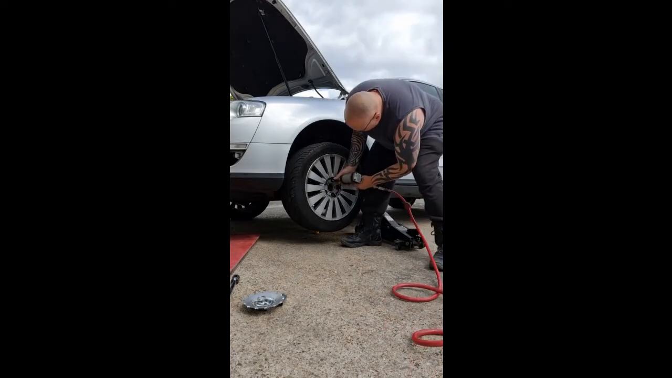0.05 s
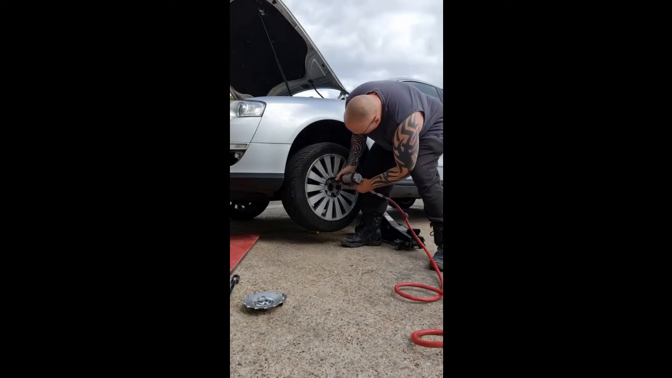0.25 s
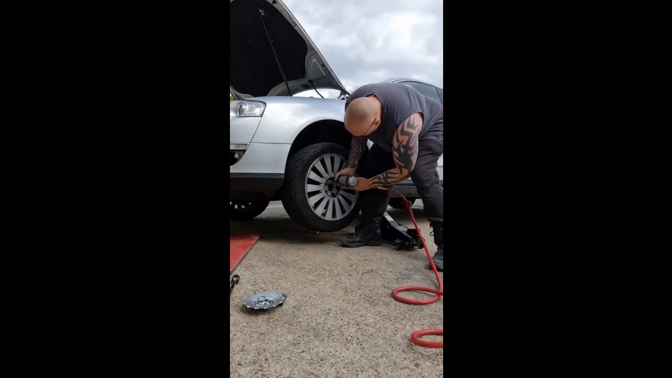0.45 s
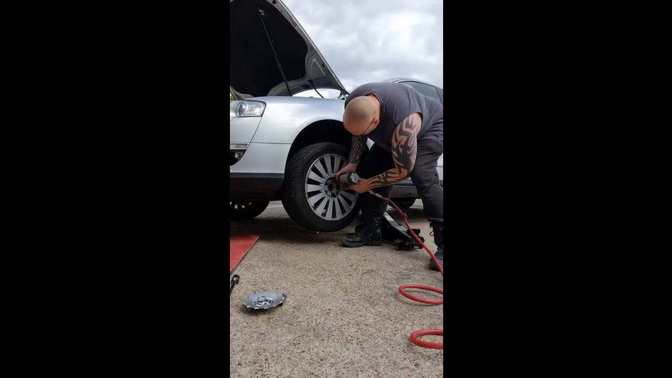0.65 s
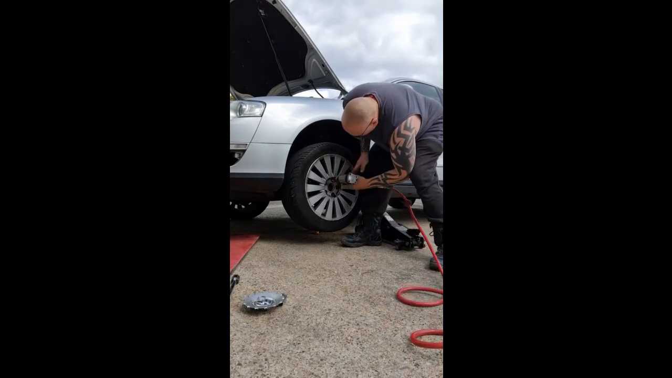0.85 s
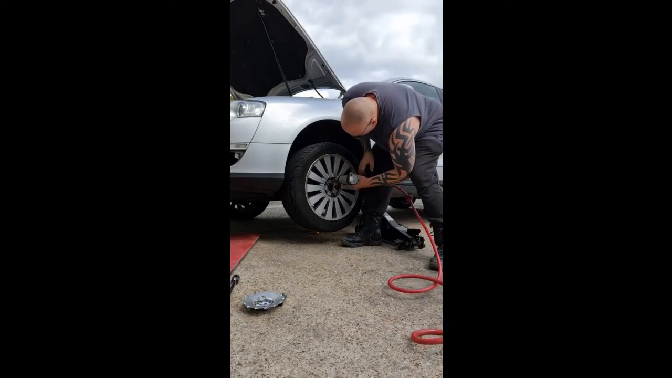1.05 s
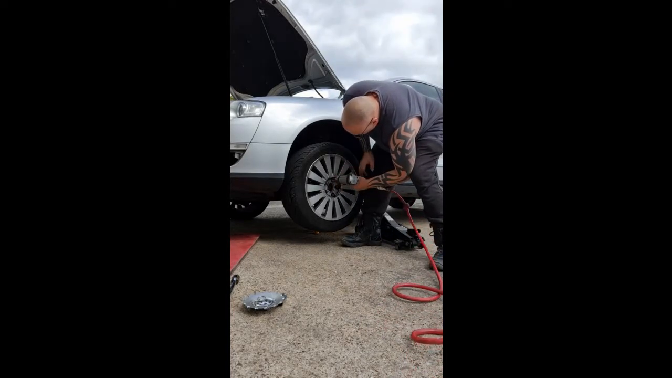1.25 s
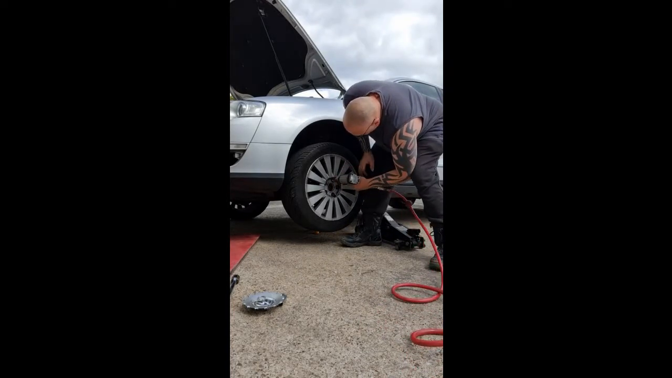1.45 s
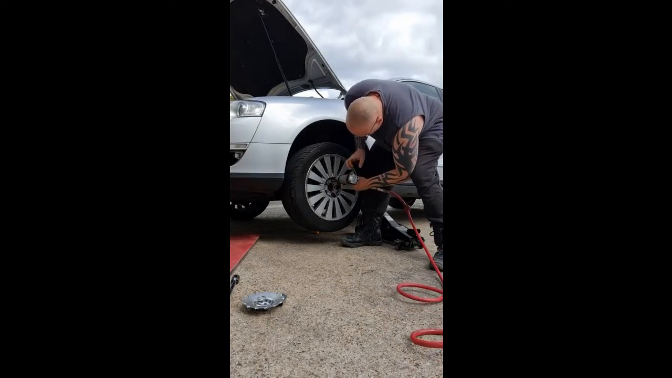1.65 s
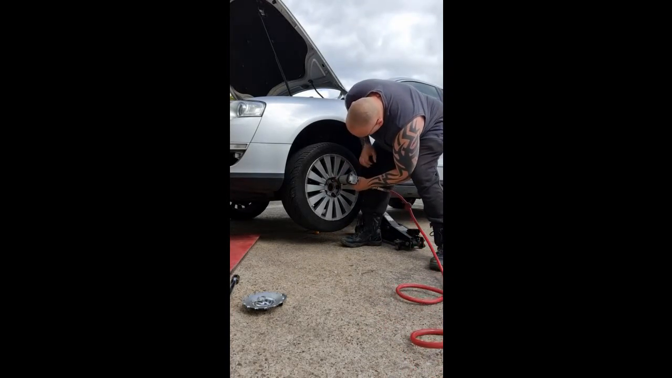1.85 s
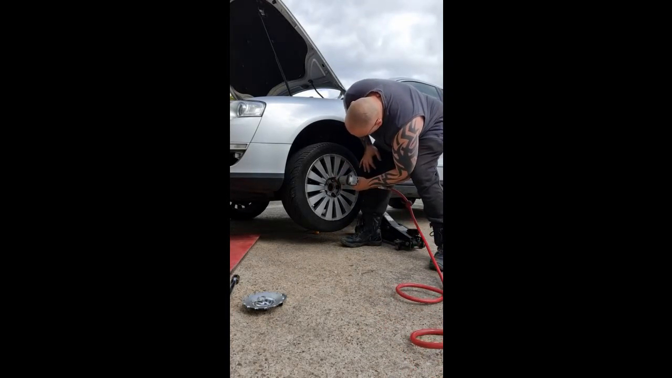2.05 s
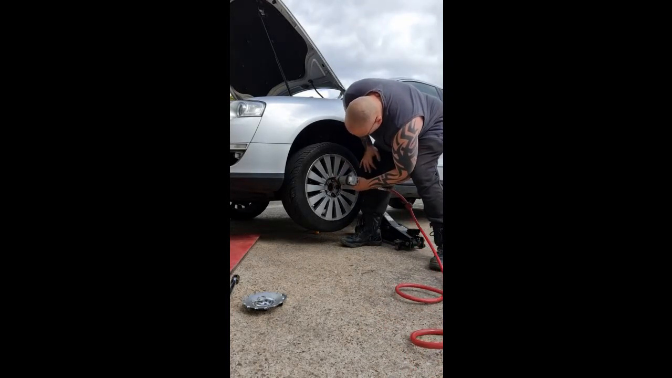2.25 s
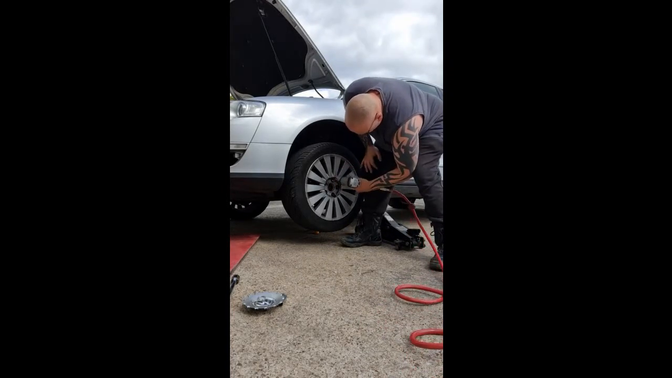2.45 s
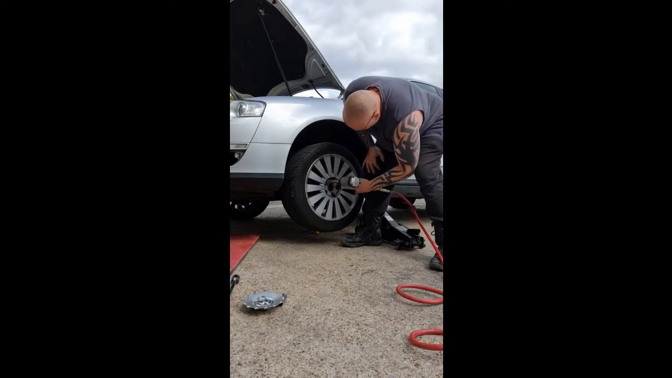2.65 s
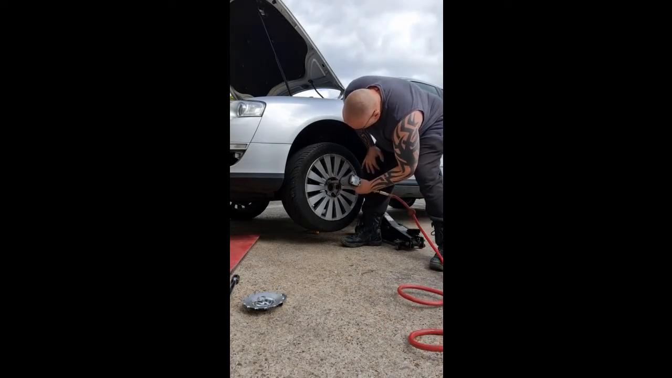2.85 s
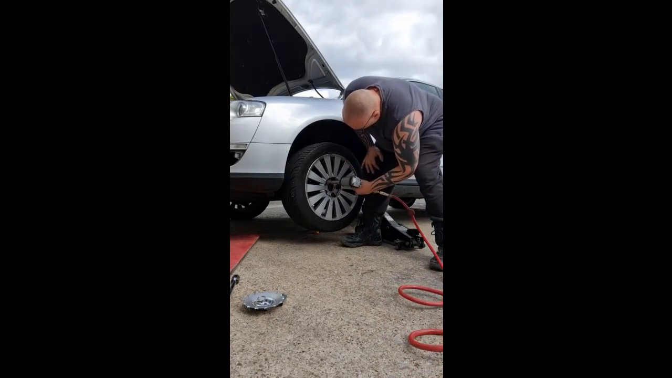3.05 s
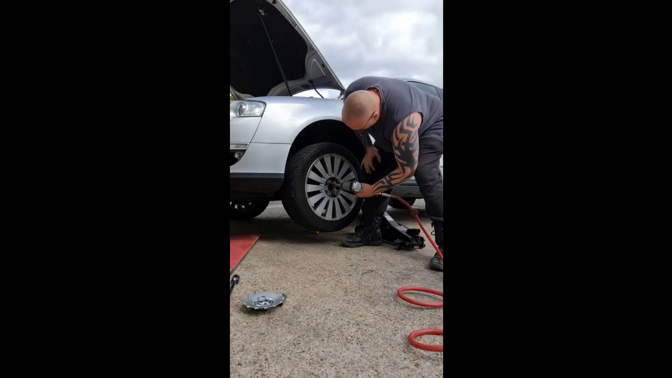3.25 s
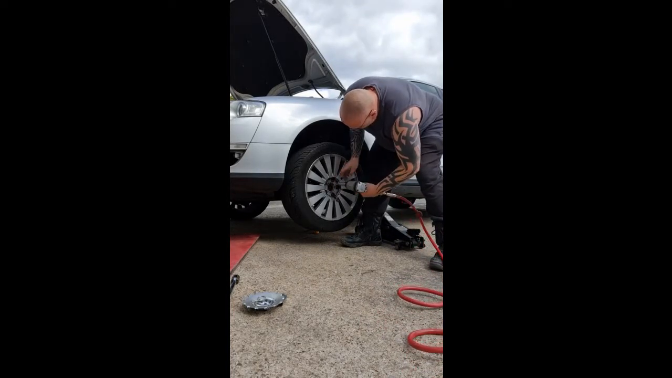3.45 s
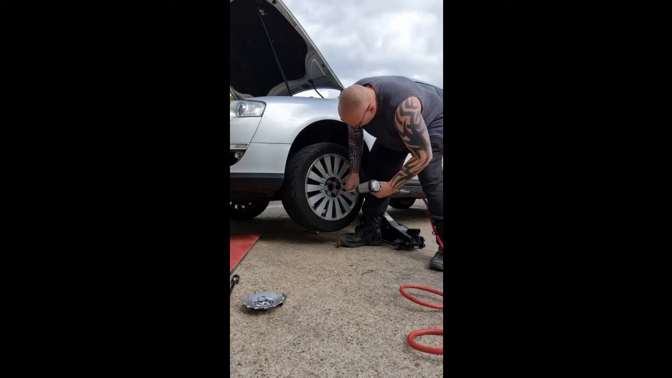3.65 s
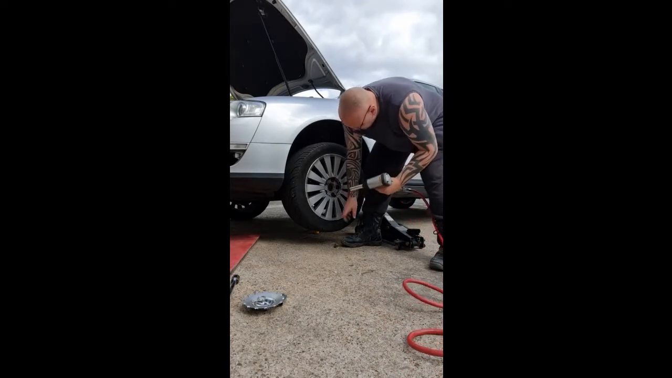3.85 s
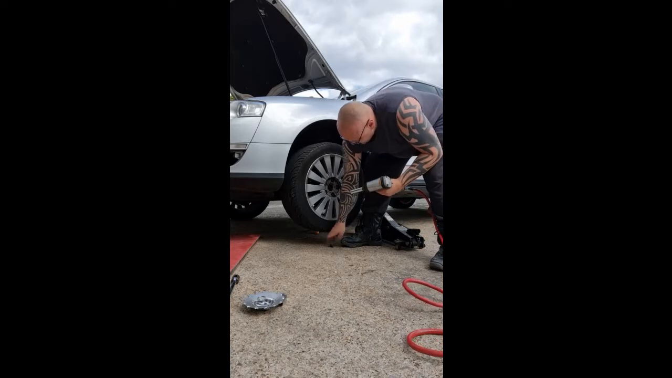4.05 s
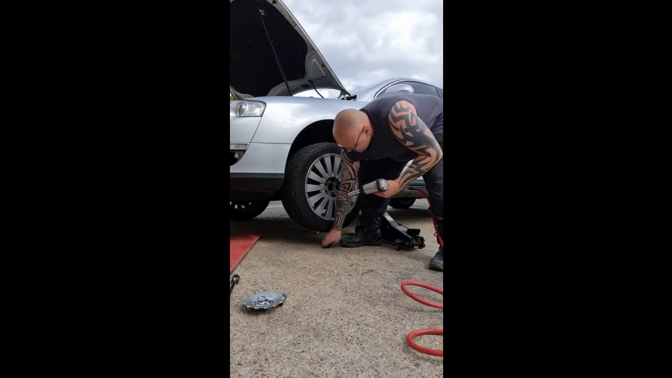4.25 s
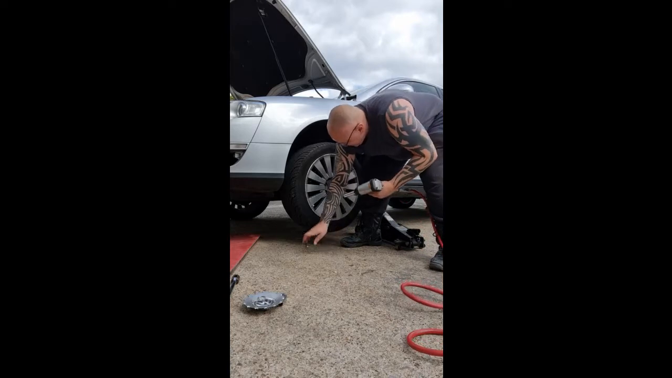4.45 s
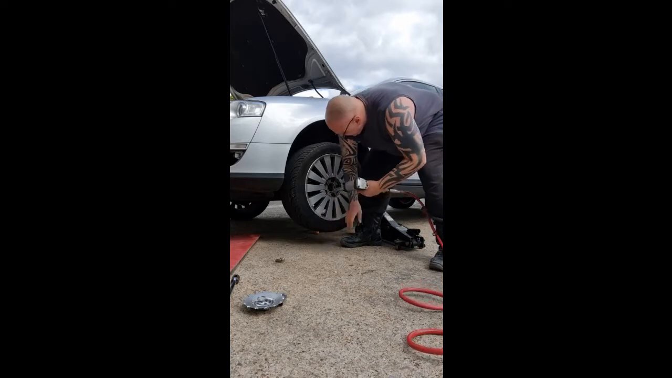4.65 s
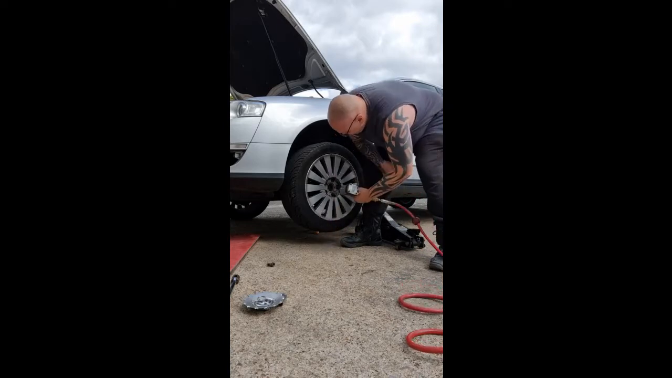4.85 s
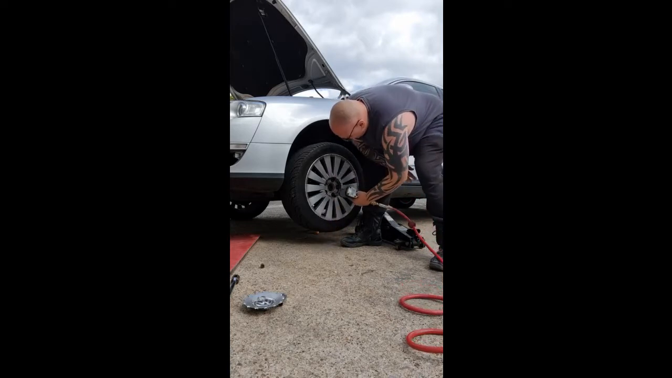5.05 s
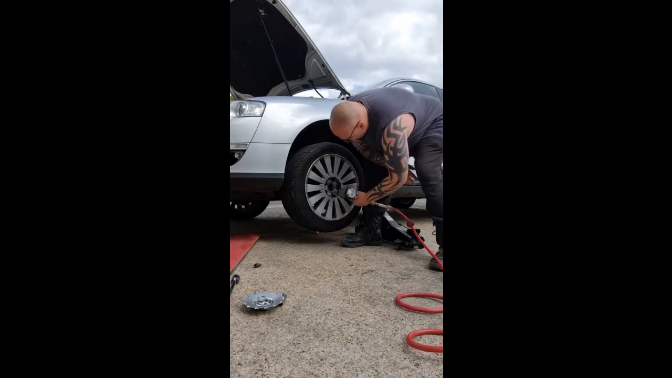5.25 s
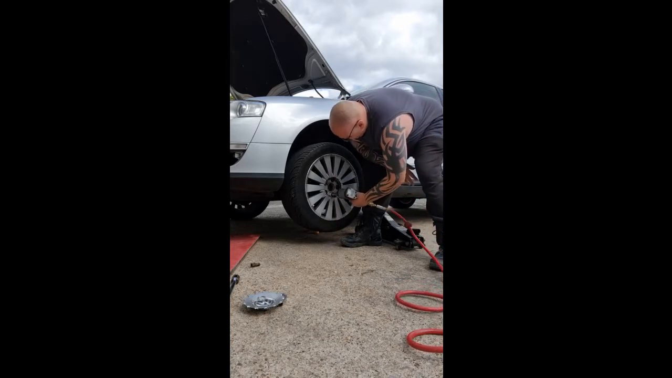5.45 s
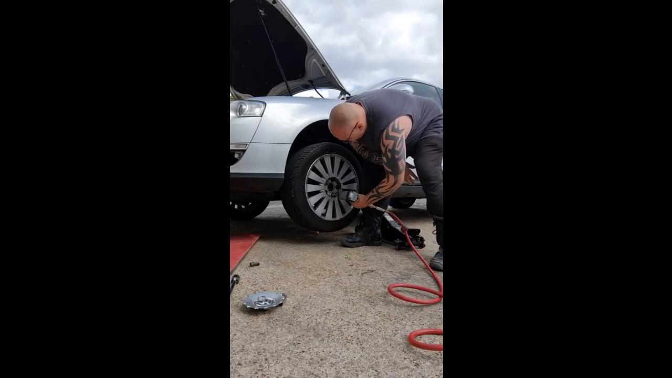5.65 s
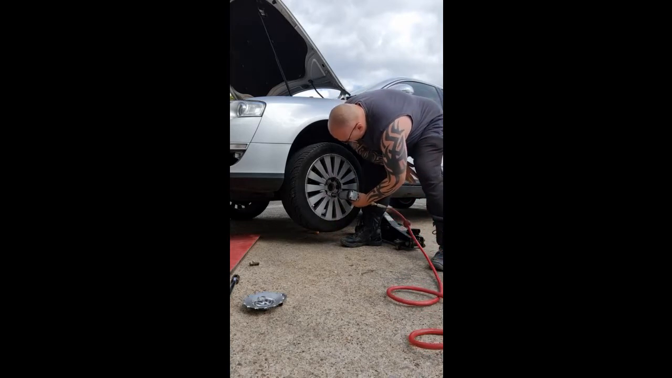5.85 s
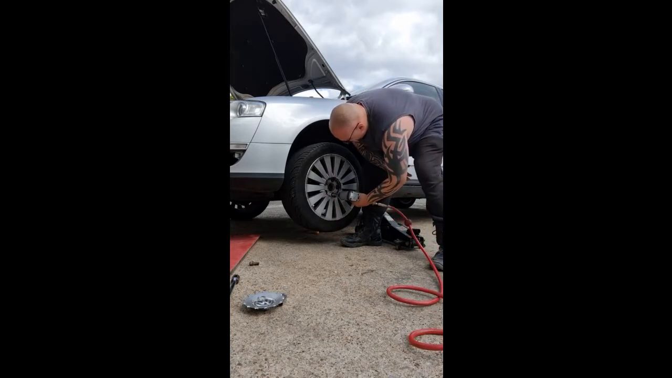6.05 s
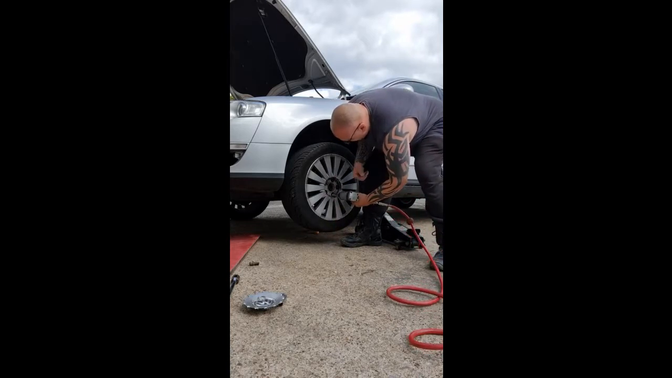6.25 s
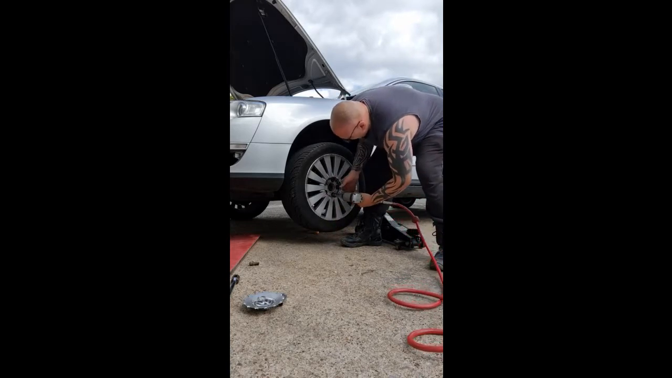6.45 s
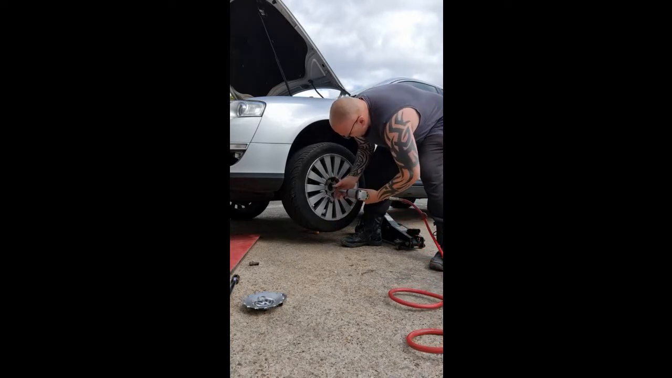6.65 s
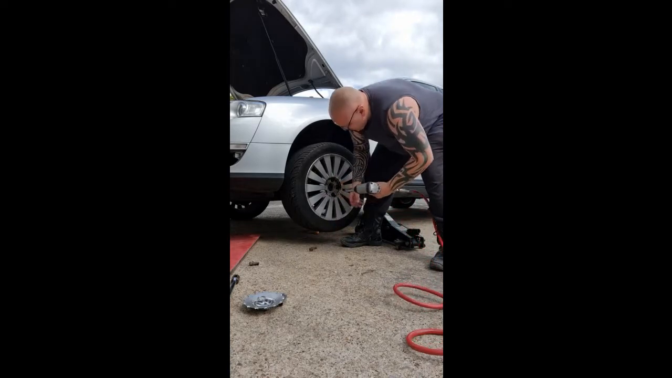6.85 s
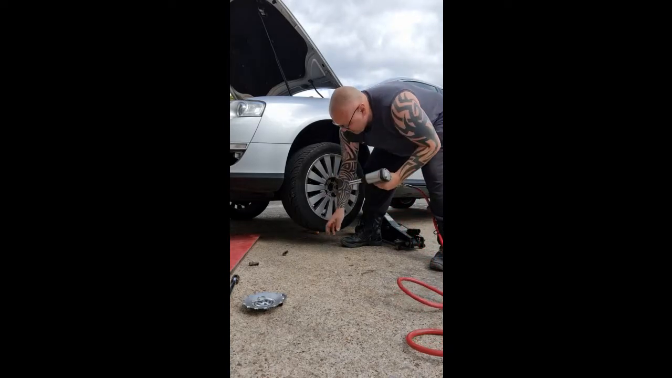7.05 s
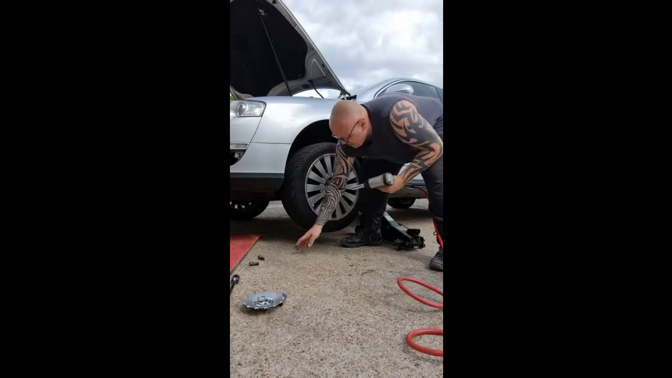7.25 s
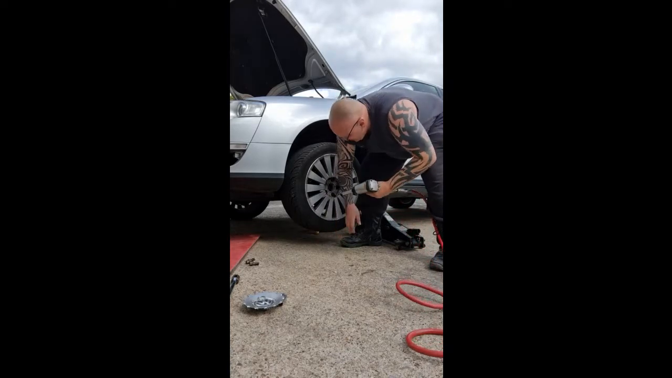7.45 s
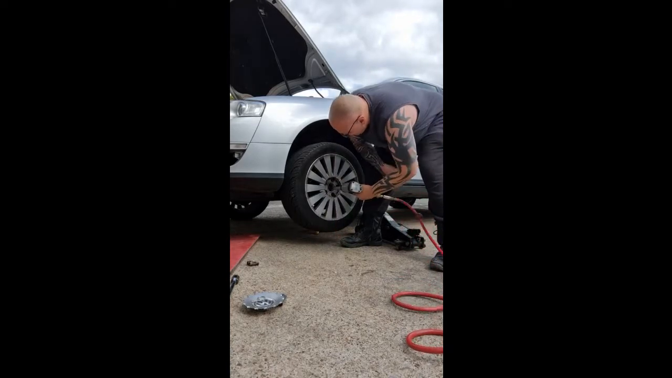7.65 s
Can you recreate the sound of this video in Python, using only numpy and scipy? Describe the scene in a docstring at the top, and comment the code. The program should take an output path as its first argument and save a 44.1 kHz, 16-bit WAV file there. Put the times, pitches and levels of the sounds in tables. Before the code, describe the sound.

Close stereo sound of wheel work in an open yard: steel knocks on a rim, a brief rattling impact burst, then a second with a falling motor whine. A loose bolt clacks in the socket and lands lightly on concrete. The socket scrapes onto the next bolt, five hard blows crack out, and the wrench whirs freely and coasts down. Air hiss and a faint distant drone lie underneath.

```python
"""Air wrench on a car wheel

An air impact wrench spins two bolts out of a jacked-up car wheel on a driveway. Each trigger pull lets out shaped
noise as air and spins up a vane motor, whose puffs ring resonances; the motor then whines and coasts down.
Hammer blows, clinks on the alloy rim and bolts on concrete are noise bursts with fading tones.
Air hiss comes and goes in spells, and a low rumble and a far machine's drone lie behind it all."""
import sys
import numpy as np
from scipy import signal
from scipy.fft import rfft, irfft, next_fast_len
from scipy.io import wavfile
from scipy.ndimage import map_coordinates

SR = 44100
rng = np.random.default_rng(int(sys.argv[2]) if len(sys.argv) > 2 else 0)


def digitize_waveform(pressure):
    """Quantize a signal to 16-bit integers and store it at the path in sys.argv[1].

    Rows of a 2-D input are taken as channels; values are limited to [-1, 1].
    """
    field = np.atleast_2d(pressure).T
    bounded = np.clip(field, -1, 1)
    quanta = np.round(bounded * 32767).astype(np.int16)
    wavfile.write(sys.argv[1], SR, quanta)


N = 339555
TIME = np.arange(N) / SR
AFTER = np.arange(SR // 2) / SR  # seconds since a contact

# Rumble level over time. Each row: time in seconds, level in dB.
RUMBLE_SWELL = [(0, -45), (1.2, -42), (3.35, -44), (3.7, -49), (5.2, -51.5), (6.9, -43), (7.7, -50)]
# Noise spectra of the background. Each row: frequency in Hz, relative level in dB per Hz.
RUMBLE = [(15, -42.5), (32, -8.5), (55, 5), (120, -9.5), (200, -24), (400, -78)]
OUTDOORS = [(80, -9.5), (190, -6), (300, -10), (560, -12.5), (830, -12.5), (1250, -15.5), (1700, -18),
            (3000, -29), (16000, -50.5)]
# A distant machine. Each row: pitch in Hz, width in Hz, level in dB.
DRONE = [(412, 9, -66), (835, 22, -63.5), (1245, 70, -65)]
RECEDE_S, RECEDE_DB_PER_S = 3.2, -0.5  # the distant sounds fall away from this time on

# Air hiss comes and goes in spells. Each row: start in seconds, end in seconds,
# fine hiss in dB, lower rush in dB.
HISS_SPELLS = [(-.1, .404, -54.5, -53.5), (.463, 3.446, -59.5, -65), (.821, 1.297, -60, -59),
               (3.554, 4.583, -55.5, -77.5), (5.127, 5.72, -62.5, -70), (6.402, 7.449, -55.5, -59)]
# Noise spectra of the air hiss. Each row: frequency in Hz, relative level in dB per Hz.
HISS = [(3000, -28.5), (6200, -7), (8000, -8), (10000, -8.5), (12000, 0.5), (16000, -6)]
RUSH = [(1200, 2), (2500, -0.5), (3600, 6), (4900, -9), (6100, 5), (7800, -28.5), (12000, -7)]

# How much the ears differ. Each row: frequency in Hz, side over mid in dB.
WIDTH = [(150, -16), (400, -11.5), (1000, -4), (2000, -2.5), (5000, 1), (12000, 0.5)]
# Sideways lean of the work at the wheel. Each row: frequency in Hz, left over right in dB.
LEAN = [(200, 0.5), (650, -2.5), (1290, 2.5), (2400, 0.5), (8000, 0.8)]
# Echo tail of the yard. Each row: frequency in Hz, time to fall 60 dB in seconds.
YARD_TAIL = [(150, 1), (1000, 0.34), (5000, 0.15), (14000, 0.074)]
TOP_HZ = 16100  # nothing sounds above this

# A loose bolt clacks in the socket. Each row: time in seconds, level in dB,
# brightness in dB per octave, high ring in dB relative to the level.
RATTLES = [(2.2553, -32, 6, 5), (2.383, -31, 9.5, 0), (2.4145, -33.5, 10.5, -2.5), (2.6635, -27.5, 5, -6),
           (3.6596, -34.5, -1, -9), (6.3614, -33.5, 4, 13), (6.8598, -25.5, 4, -26)]
# Lighter rattles while a freed bolt spins down.
CHATTER_S, CHATTER_DB, CHATTER_RING_DB = 0.14, -33.5, 7.5
# Bolts touch the concrete. Each row: time in seconds, level in dB.
TICKS = [(4.5455, -42.5), (4.6295, -41), (4.6895, -47), (4.7643, -49.5), (7.0649, -39.5), (7.663, -53.5)]
# Socket and bolts meet the rim. Each row: time in seconds, level in dB, brightness in dB per octave,
# tyre thud in dB, rim ring in dB relative to the level.
CLINKS = [(0.048, -24, 2, -36.5, -11), (0.3632, -30, -1, -52, -9.5), (0.5129, -25, 0.5, -28.5, -14),
          (2.707, -31.5, 1.5, -36, -9.5), (2.7444, -22, 3.5, -44, -18.5), (3.251, -23.5, -1, -65, -5.5),
          (3.336, -34.5, -3.5, -62, -4.5), (3.3599, -36.5, -5, -65, -8.5), (3.4, -42.5, -4, -63, 0.5),
          (3.437, -43, -2.5, -65, -10), (5.026, -28, -7.5, -60, -10), (5.0402, -28.5, 0, -39.5, -13),
          (5.2833, -34, -2, -53.5, -11.5), (5.3083, -28, -5, -45, -17), (5.3236, -27.5, -1, -34.5, -15),
          (5.3786, -29.5, 4.5, -54, -9.5), (5.507, -19, -0.5, -23.5, -15.5), (6.419, -43.5, -4, -60, -12),
          (6.479, -48, -1, -60, -17)]
# Each knock settles in a few uneven, ever weaker bounces: typical gap, first level, change per further bounce.
SETTLE_S, SETTLE_DB, SETTLE_LOSS_DB = 0.009, -10.5, -8.5
# Dull bumps as the wheel is leaned on. Each row: time in seconds, level in dB, pitch in Hz.
BUMPS = [(0.78, -26, 108.5), (0.81, -34.5, 130), (3.154, -31, 67.5), (3.282, -32.5, 58.4)]

# Hammer blows while a bolt resists. Each row: time in seconds, level in dB, brightness in dB per octave,
# then relative to the level: wheel thud in dB, socket ring in Hz, ring in dB.
BLOWS = [(1.2662, -18, 0, -15, 5600, 1), (1.2952, -10.5, 0, -21.5, 6180, -4),
         (1.3255, -14, 14, -16.5, 3420, -9.5), (1.3522, -11, 6.5, -14.5, 4370, -13),
         (1.3781, -12.5, 5, -17.5, 5530, -1), (1.9703, -24, 6.5, -10.5, 5000, -7.5),
         (2.002, -11, 5, -12.5, 2490, -3), (2.0385, -11.5, 6.5, -21.5, 5400, -5.5),
         (5.734, -16.5, 0.5, -30, 2846, -5.5), (5.7671, -12, -3, -6.5, 3510, -4),
         (5.8, -9, -5, -11.5, 2870, -3.5), (5.8296, -12, -3.5, -18.5, 2910, -1),
         (5.864, -10.5, -1.5, -11.5, 4100, 1.5)]
# The socket jolts as the drive is taken up or let go. Each row: as for the blows.
JOLTS = [(1.248, -22, -6.5, -17.5, 5960, -7.5), (1.9515, -26.5, -1.5, -9.5, 1900, -9),
         (5.7175, -20, -5.5, -15.5, 5870, -10), (5.9185, -12, 1, -15, 5980, -6),
         (5.942, -24, 2.5, -12, 6020, -15)]
RECOIL_S, RECOIL_DB = .011, -9.5  # the hammer falls back on the anvil: typical delay, relative level

# Ringing parts. Each row: pitch in Hz, relative level in dB, time to fall 60 dB in seconds.
RIM = [(564, -7.5, 0.08), (1352, 3, 0.068), (1742, -1.5, 0.12), (3125, -4.5, 0.09), (3620, 3, 0.021),
       (4450, -6.5, 0.035)]
ANVIL = [(1260, -2.5, 0.05), (1735, -0.5, 0.089), (2047, -3, 0.09), (2433, -5, 0.085), (2866, -4.5, 0.05),
         (3380, -4, 0.07), (4120, -0.5, 0.027), (5200, -6.5, .08), (5950, -1.5, 0.075)]
WHEEL = [(206, -2.5, 0.085), (262.3, -7.5, .08), (400, -11.5, 0.17), (534, -18.5, 0.82), (603, 1, 0.08),
         (695, -3, 0.091)]
TYRE = [(222.3, -3, 0.15), (184.6, -3.5, 0.19), (274, -6, .09), (398, 0, 0.038)]
BOLT = [(2555, 2, 0.04), (3340, 7, 0.069), (4196, 14, 0.045), (5010, 18, 0.043)]
# Noise spectra of the contacts. Each row: frequency in Hz, relative level in dB per Hz.
CRACK = [(120, -42), (200, -22), (3560, -6), (6050, -2.5), (7270, -16.5), (8580, -0.5), (14900, -12.5),
         (16000, -27.5)]
CLACK = [(180, -35), (300, -19), (915, -9.5), (1280, -3.5), (2650, -7.5), (3640, -6), (4160, -16),
         (5610, -12.5), (7320, -26), (8500, -22.5), (16000, -39.5)]
GRIT = [(500, -22.5), (2000, -2), (4500, -2), (8000, -12), (16000, -29.5)]
HIGH_RING = [(13500, -60.5), (14650, -8), (15800, -58.5)]

# Faint whistle of escaping air, sinking as the rotor stops. Each row: time in seconds, pitch in Hz, level in dB.
AIR_WHISTLE = [(6.5, 2880, -61), (6.66, 2620, -54), (6.735, 2470, -48.5), (6.78, 2450, -63), (7, 2450, -64)]

# Trigger pulls. Each row: open in seconds, shut in seconds, vane rate that the load allows in Hz,
# friction (1 = free bolt), air in dB, air brightness in dB per octave, whine in dB, bearing rasp in dB,
# socket judder in dB.
PULLS = [(1.243, 1.374, 329.7, 3.75, -20, 1, -38, -36.5, -23),
         (1.943, 2.136, 445.8, 1.026, -24, 1.5, -18, -36, -21),
         (5.708, 5.898, 311.2, 1.9, -22.5, 1.2, -19, -36, -26),
         (6.022, 6.183, 459.8, 1.01, -22.5, 1.5, -20.5, -36, -35)]
SPIN_UP_S, DRAIN_S = .06, .015  # the rotor's lag behind the air; the drive outlasts the trigger
DRAG, STOP_S = .0106, .91  # coasting: drag per vane pass, dry-friction time; friction shortens both
FULL_HZ = 400  # vane rate at which growth with speed adds nothing
WHINE_DB_PER_OCTAVE, RASP_DB_PER_OCTAVE = 18.5, 6  # growth with speed
LOAD_DB = -7  # the tone gives way under load
# A narrow resonance that whistles after the last pull opens. Each row: vane rate in Hz,
# resonance in Hz, level in dB.
WHISTLE = [(90, 1220, -50), (115, 1230, -33), (160, 1265, -26.5), (230, 1295, -20), (430, 1325, -14)]
WHISTLE_WIDTH_HZ = 42
SECOND_BOLT_S = 4  # the second bolt's resonances hold from here
# The motor's lowest tone. Each row: vane rate in Hz, level in dB.
HUM = [(50, -51.5), (100, -33), (150, -33.5), (195, -28), (280, -39), (430, -29)]
# Resonances under the whine. Each row: frequency in Hz, width in Hz, dB at the first bolt, dB at the second.
BODY = [(543, 100, -9, -3), (805, 26, -4, 4.5), (1140, 300, -9, 0.5), (1775, 130, 0.5, 0),
        (2010, 81, -2.5, -19), (2510, 38.6, -2.5, -4.5), (2760, 34, -16.5, -11), (3250, 100, -14, -20),
        (3890, 130, -20, -9.5), (5870, 180, -9.5, -41)]
# Resonances of the spinning socket as it jiggles on the bolt head. Each row: frequency in Hz,
# width in Hz, dB at the first bolt, dB at the second.
SOCKET = [(1890, 190, 0, -6.5), (2415, 87, -2, -4.5), (2850, 17, -11.5, -2.5), (3270, 90, -4.5, -4),
          (3810, 53, -15.5, -2.5), (5070, 58, -13, -9), (5940, 250, 0, -5.5)]
JIGGLES_PER_S, JUDDERS_PER_S, JIGGLE_SPREAD_DB = 1000, 330, 3
JIGGLE_DB, JIGGLE_DB_PER_OCTAVE = -20.5, 7  # level at FULL_HZ and growth with speed
# Noise spectra of the motor and its air. Each row: frequency in Hz, relative level in dB per Hz.
RASP = [(150, 8), (500, -0.5), (1000, 4.5), (1900, 4.5), (4800, -7), (6000, -6.5), (7800, -9.5),
        (12500, -5.5), (16000, -19)]
EXHAUST = [(59, -19.5), (100, -1.5), (784, -0.5), (1030, -11.5), (1250, -5), (1420, -5), (2040, 0),
           (2270, -9.5), (2470, -2.5), (4200, -6.5), (5770, -9), (7770, -12), (10700, -12), (14700, -18.5),
           (16000, -33.5)]


def amp(db):
    """Turn decibels into gain."""
    return 10 ** (np.asarray(db) / 20)


def unit(x):
    """Scale to an average (rms) level of 1."""
    return x / np.sqrt(np.mean(x ** 2) + 1e-20)


def along(points, hz):
    """Read a value between (Hz, value) points on a log axis."""
    f, v = np.transpose(points)
    return np.interp(np.log(hz + 1), np.log(f + 1), v)


def wobble(rate):
    """A smooth random curve with rate knots a second."""
    knots = rng.standard_normal(int(N * rate / SR) + 4)
    return map_coordinates(knots, [TIME * rate])


def filtered(x, response):
    """Shape x by a gain, possibly complex, at each frequency."""
    n = x.shape[-1]
    m = next_fast_len(n + 8192)
    return irfft(rfft(x, m) * response(np.fft.rfftfreq(m, 1 / SR)), m)[..., :n]


def resonance(f, hz, width_hz):
    """How strongly one resonance answers at frequencies f."""
    return 1j * f * width_hz / (hz * hz - f * f + 1j * f * width_hz)


def through(x, resonances, second):
    """Send x through resonances whose strengths change from the first bolt to the second."""
    def at(bolt):
        def response(f):
            # neighbours take opposite signs
            return sum((-1) ** k * amp(db[bolt]) * resonance(f, hz, width)
                       for k, (hz, width, *db) in enumerate(resonances))
        return filtered(x, response)
    return np.where(second, at(1), at(0))


def gliding(x, hz, width_hz):
    """Send x through a moving resonance: shift it down to 0 Hz, smooth it, shift it back."""
    turn = np.exp(2j * np.pi * np.cumsum(hz) / SR)
    keep = np.exp(-np.pi * width_hz / SR)
    return 2 * np.real(turn * signal.lfilter([1 - keep], [1, -keep], x / turn))


def noise(spectrum, size=N, tilt_db=0, width=WIDTH):
    """Coloured stereo noise of rms 1, tilted in dB per octave; width sets how far the ears differ."""
    def colour(hz):
        tone = amp(along(spectrum, hz) + tilt_db * np.log2(hz + 1))
        return tone * amp([0 * hz, along(width, hz)])
    mid, side = filtered(rng.standard_normal((2, size)), colour)
    return unit(np.array([mid + side, mid - side]))


def mix(hits):
    """Lay short (seconds, sound) pairs on one stereo track."""
    track = np.zeros((2, N + SR))
    for s, sound in hits:
        start = max(round(s * SR), 0)
        track[:, start:][:, :len(AFTER)] += sound
    return track[:, :N]


def ring(modes, detune=0, spread_db=2, rough=0):
    """Fading tones of a struck part, with new strengths each time; rough makes their phases wander."""
    hz, db, t60 = np.transpose(modes)[:, :, None]
    hz = hz * (1 + detune * rng.standard_normal(hz.shape))  # a held part changes a little with each grip
    sizes = amp(db + spread_db * rng.standard_normal(db.shape))
    # high tones reach the two ears out of step
    ear_shift = amp(along(WIDTH, hz)) * rng.standard_normal((2, *db.shape))
    phase = rng.uniform(0, 2 * np.pi, db.shape) + ear_shift
    if rough:
        steps = np.sqrt(hz / SR) * rng.standard_normal((len(hz), len(AFTER)))
        phase = phase + rough * np.cumsum(steps, axis=1)
    tones = np.sin(2 * np.pi * hz * AFTER + phase)
    return np.sum(sizes * amp(-60 * AFTER / t60) * tones, axis=1)


def burst(spectrum, t60, tilt_db=0):
    """The dense, quickly dying noise of a contact."""
    return noise(spectrum, size=len(AFTER), tilt_db=tilt_db) * amp(-60 * AFTER / t60)


def attack(rise):
    """The start of a contact, climbing from 0 to 1."""
    return 1 - np.exp(-AFTER / rise)


def contact(s, sound, rise=0.0013, lead_s=0.0056, lead_db=-7):
    """Metal scuffs for a moment before it seats and sounds in full."""
    seat = (s - .001, sound * attack(rise))
    scuff_start = s - lead_s * rng.uniform(.6, 1.3)
    return [seat, (scuff_start, amp(lead_db) * sound * attack(0.0062))]


def swell(on, off, rise, fall=0.0087):
    """A level that builds towards 1 from one time on and drains away after another, as air behind a valve."""
    build = 1 - np.exp(-np.maximum(TIME - on, 0) / rise)
    return build * np.exp(-np.maximum(TIME - off, 0) / fall)


def outdoors():
    """Low rumble, distant noise and a far machine's drone, made of noise in narrow wavering bands."""
    rumble_db = np.interp(TIME, *np.transpose(RUMBLE_SWELL)) + 2.4 * wobble(10)
    rumble = amp(rumble_db) * noise(RUMBLE, width=[(60, -6.0), (120, -5.5)])
    far = amp(-55.5 + 1.0 * wobble(22)) * noise(OUTDOORS)
    drift = 1 + .012 * wobble(5)
    drone = 0
    for hz, width, db in DRONE:
        band = unit(gliding(rng.standard_normal(N), hz * drift, width))
        drone = drone + amp(db + 1.6 * wobble(2)) * band
    recede = amp(RECEDE_DB_PER_S * np.maximum(TIME - RECEDE_S, 0))
    return rumble + recede * (far + drone)


def air_hiss():
    """Air hiss comes and goes in spells, as two bands of noise: a fine hiss and a lower rush."""
    spells = np.array([swell(on, off, rise=0.036, fall=0.025) for on, off, *_ in HISS_SPELLS])
    hiss, rush = amp(np.transpose(HISS_SPELLS)[2:]) @ spells
    return amp(0.68 * wobble(2.4)) * hiss * noise(HISS) + amp(0.82 * wobble(25)) * rush * noise(RUSH)


def driveway(x, near_t60=0.14, near_db=-9, tail_db=-15):
    """Ground and car body scatter the sound at once; house walls add a tail that dies sooner in the treble."""
    scatter = rng.standard_normal((2, len(AFTER))) * amp(-60 * AFTER / near_t60)
    hz, t, z = signal.stft(rng.standard_normal((2, len(AFTER))), SR, nperseg=256)
    fade = amp(-60 * t / along(YARD_TAIL, hz)[:, None]) * (1 - np.exp(-t / 0.0035))
    tail = signal.istft(z * fade, SR, nperseg=256)[1][:, :len(AFTER)]
    echoes = amp(near_db) * scatter / np.linalg.norm(scatter[0])
    echoes = echoes + amp(tail_db) * tail / np.linalg.norm(tail[0])
    # the bass reaches both ears nearly alike
    mid, side = filtered(echoes, lambda hz: amp([0 * hz, along(WIDTH, hz)]))
    stereo = np.array([mid + side, mid - side]) / np.sqrt(2)
    return x + signal.fftconvolve(x, stereo, axes=1)[:, :N]


def bolts(count=4):
    """A freed bolt chatters in the socket, and bolts tick on concrete: gritty bursts with steel ringing."""
    freed = [off for _, off, _, friction, *_ in PULLS if friction < 1.4]
    chatter = []
    for off in freed:
        for k in range(count):
            s = off + CHATTER_S * (k + rng.random()) / count
            chatter.append((s, CHATTER_DB + rng.normal(0, 0.77), 0, CHATTER_RING_DB))
    hits = []
    for s, db, tilt_db, high_db in list(RATTLES) + chatter:
        click = burst(GRIT, t60=0.04, tilt_db=tilt_db)
        high_ring = amp(high_db) * burst(HIGH_RING, t60=.03)
        hits += contact(s, amp(db) * (click + amp(-26.5) * ring(BOLT) + high_ring))
    for s, db in TICKS:
        click = burst(GRIT, t60=0.05, tilt_db=1.2)
        hits += contact(s, amp(db) * (click + amp(-21) * ring(BOLT, detune=.084)))
    return mix(hits)


def rim_knock(db, tilt_db, rim_db):
    """Steel clicks on the rim, which rings roughly."""
    rim = ring(RIM, detune=.02, spread_db=2.5, rough=.18)
    return amp(db) * (burst(CLACK, t60=0.033, tilt_db=tilt_db) + amp(rim_db) * rim)


def clinks(count=3):
    """Each rim knock settles in weaker bounces while the tyre answers dully; bumps are low fading tones."""
    hits = []
    for s, db, tilt_db, thud_db, rim_db in CLINKS:
        thud = amp(thud_db) * ring(TYRE, detune=0.033)
        hits += contact(s, rim_knock(db, tilt_db, rim_db) + thud)
        delays = np.cumsum(SETTLE_S * rng.uniform(.5, 1.6, count))
        for k, delay in enumerate(delays):
            bounce = amp(SETTLE_DB + SETTLE_LOSS_DB * k) * rim_knock(db, tilt_db, rim_db)
            hits.append((s + delay, bounce))
    for s, db, hz in BUMPS:
        hits.append((s, amp(db) * ring([(hz, 0, .16)]) * attack(0.0035)))
    return mix(hits)


def blow(db, tilt_db, thud_db, ring_hz, ring_db, steel_db=-10):
    """Steel cracks on the anvil and rings the socket; the blow travels through the bolt into the wheel."""
    crack = burst(CRACK, t60=0.03, tilt_db=tilt_db)
    steel = amp(steel_db) * ring(ANVIL, detune=.012) + ring([(ring_hz, ring_db, .035)])
    thud = amp(thud_db) * ring(WHEEL, detune=.012)
    return amp(db) * (crack + steel + thud) * attack(.0004)


def hammer():
    """The blows, each with a weaker recoil just after it, and the socket's jolts."""
    hits = [(s, blow(*stroke)) for s, *stroke in list(BLOWS) + list(JOLTS)]
    for s, db, *colour in BLOWS:
        hits.append((s + RECOIL_S * rng.uniform(.85, 1.2), blow(db + RECOIL_DB, *colour)))
    return mix(hits)


def air_whistle(breathy=.028):
    """A weak tone that slides down and fades; its fast-wandering pitch makes it breathy."""
    s, hz, db = np.transpose(AIR_WHISTLE)
    pitch = np.interp(TIME, s, hz) * (1 + breathy * np.array([wobble(450), wobble(450)]))
    level_db = np.interp(TIME, s, db, left=-np.inf, right=-np.inf) + 3 * wobble(90)
    return amp(level_db) * np.sin(2 * np.pi * np.cumsum(pitch, axis=1) / SR)


def speed():
    """Vane rate in Hz: air drives the rotor up to what the load allows; then drag and dry friction slow it."""
    rate = np.zeros(N)
    for on, off, top_hz, friction, *_ in PULLS:
        held = np.clip(TIME - on, 0, off + DRAIN_S - on)
        driven = top_hz + (rate[round(on * SR)] - top_hz) * np.exp(-held / SPIN_UP_S)
        coast = friction * np.maximum(TIME - off - DRAIN_S, 0)
        slowed = driven / (1 + DRAG * driven * coast) * np.exp(-(coast / STOP_S) ** 2)
        rate = np.where(TIME < on, rate, slowed)
    return np.maximum(rate, 1)


def puffs(phase, turning, uneven_db=1.9, rough_db=1.7, count=6):
    """One puff per vane as a stack of overtones; unequal vanes put weak lines between them."""
    orders = np.arange(2, 29)[:, None]
    train = np.zeros(N)
    spinning = turning > 0
    train[spinning] = np.sum(np.cos(orders * phase[spinning]) / orders ** .5, axis=0)
    vane = (phase / (2 * np.pi) + .5).astype(int) % count
    vane_db = uneven_db * unit(rng.standard_normal(count))
    return train * amp(vane_db[vane] + rough_db * wobble(300))


def jiggle(per_s, second):
    """Tiny uneven contacts ring the spinning socket; at equal loudness, fewer contacts are harder ones."""
    struck = rng.random(N) < per_s / SR
    sizes = amp(JIGGLE_SPREAD_DB * np.clip(rng.standard_normal(N), -2, 2))
    ears = 1 + 1.2 * rng.uniform(-2, 2, (2, N))
    return through(unit(struck * sizes * ears), SOCKET, second)


def motor(rate, phase, turning):
    """Vanes puff past the port: hum, overtones that flare as they sweep resonances, rasp and socket jiggle."""
    opens, *_, whine_db, rasp_db, judder_db = np.transpose(PULLS)
    pull = np.maximum(np.searchsorted(opens, TIME) - 1, 0)  # the latest pull at each moment
    octaves = np.log2(rate / FULL_HZ)
    second = TIME > SECOND_BOLT_S
    train = puffs(phase, turning)
    whine = amp(whine_db[pull] + WHINE_DB_PER_OCTAVE * octaves) * through(train, BODY, second)
    # an overtone whistles as it slides through the narrow resonance, which sinks with the rotor
    rates, resonance_hz, resonance_db = np.transpose(WHISTLE)
    whistle_hz = np.interp(rate, rates, resonance_hz)
    whistle_gain = (TIME > opens[-1]) * amp(np.interp(rate, rates, resonance_db) + 2 * wobble(30))
    whistle = whistle_gain * gliding(train, whistle_hz, WHISTLE_WIDTH_HZ)
    # the spinning socket beams unevenly to the two ears
    beam = amp(2 * np.array([wobble(40), wobble(40)]))
    hum = amp(along(HUM, rate)) * np.sin(phase)
    load = sum(swell(on, off, rise=0.0083) for on, off, *_ in PULLS)
    rasp_gain = amp(rasp_db[pull] + RASP_DB_PER_OCTAVE * octaves + 0.9 * wobble(70))
    rasp = rasp_gain * noise(RASP) * (1 + .5 * np.cos(phase))
    socket = amp(JIGGLE_DB + JIGGLE_DB_PER_OCTAVE * octaves) * jiggle(JIGGLES_PER_S, second)
    socket += amp(judder_db[pull]) * load * jiggle(JUDDERS_PER_S, second)
    tone = amp(LOAD_DB * load) * (beam * (whine - whistle) + hum)
    return turning * (tone + rasp + socket)


def wrench(jitter=0.007, chop=.31, flutter_db=1.5, stall_hz=52):
    """The motor and its exhaust jet, a rush of noise that the passing vanes chop."""
    rate = speed()
    turning = np.clip(0.5 * (rate / stall_hz - 1), 0, 1)  # motor is silent below the stall rate
    phase = 2 * np.pi * np.cumsum(rate * (1 + jitter * wobble(130))) / SR
    jet = 0
    for on, off, _, _, air_db, tilt_db, *_ in PULLS:
        jet = jet + amp(air_db) * swell(on, off, rise=0.016) * noise(EXHAUST, tilt_db=tilt_db)
    chopped = jet * (1 + chop * turning * np.cos(phase))
    return motor(rate, phase, turning) + amp(flutter_db * wobble(150)) * chopped


def scene():
    """The work at the wheel, leaning a little between the ears, over the air hiss and the outdoor background."""
    work = driveway(wrench() + air_whistle() + hammer() + clinks() + bolts())
    placed = filtered(work, lambda hz: amp(np.outer([.5, -.5], along(LEAN, hz))))
    return placed + air_hiss() + outdoors()


def record(dry, ceiling=0.93):
    """Round off the hardest peaks smoothly, then remove everything above the band limit."""
    rounded = dry / (1 + (dry / ceiling) ** 4) ** .25
    return filtered(rounded, lambda hz: hz < TOP_HZ)


dry = scene()
out = record(dry)
digitize_waveform(out)
```